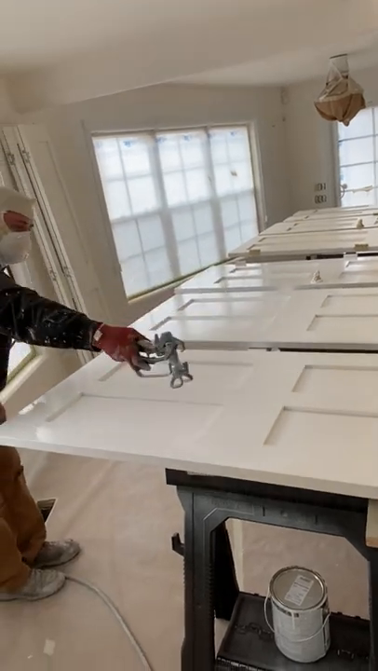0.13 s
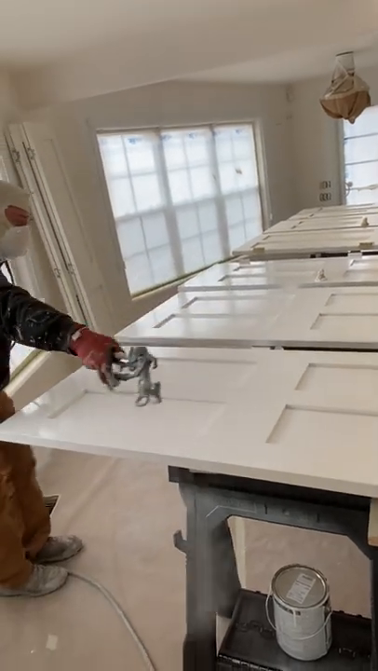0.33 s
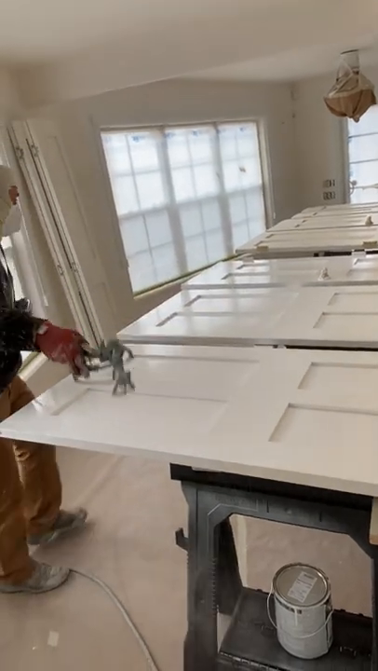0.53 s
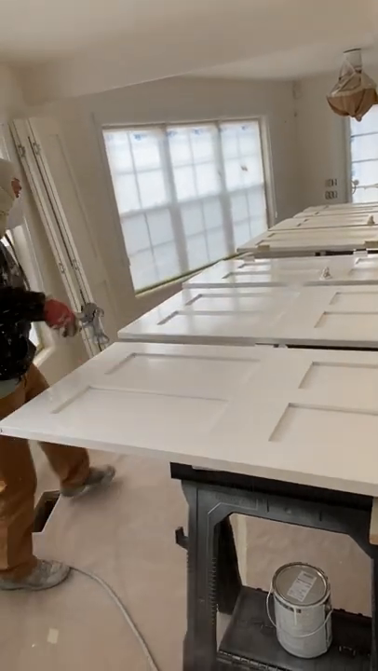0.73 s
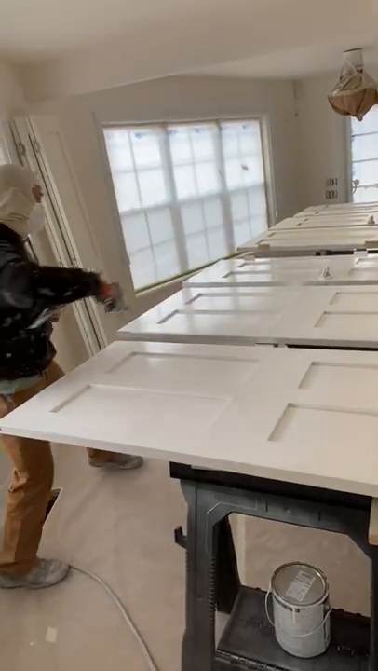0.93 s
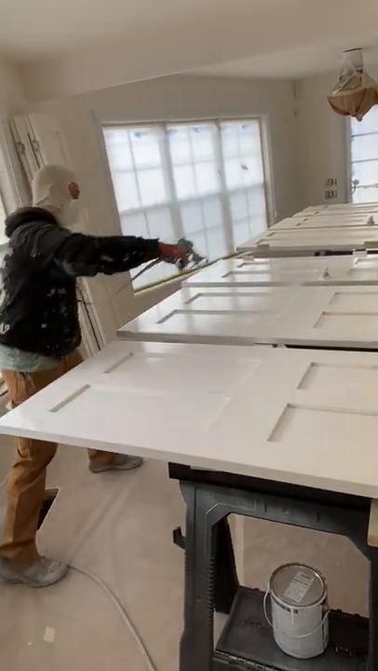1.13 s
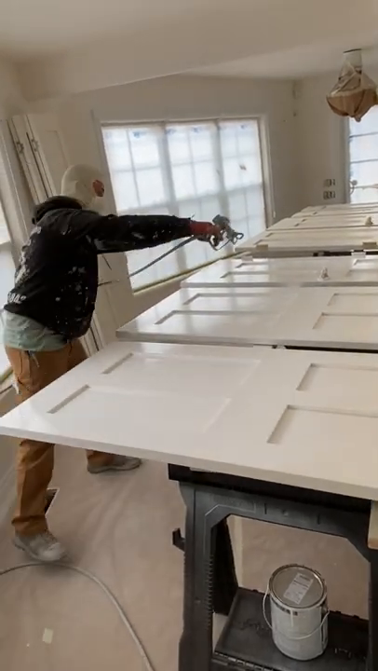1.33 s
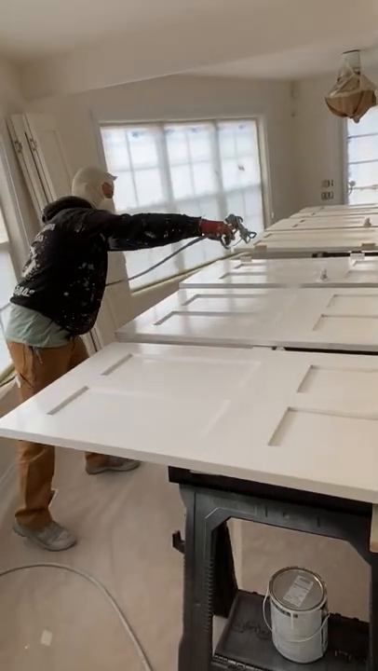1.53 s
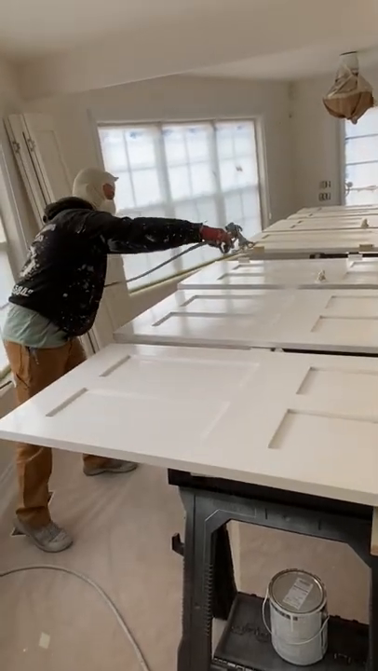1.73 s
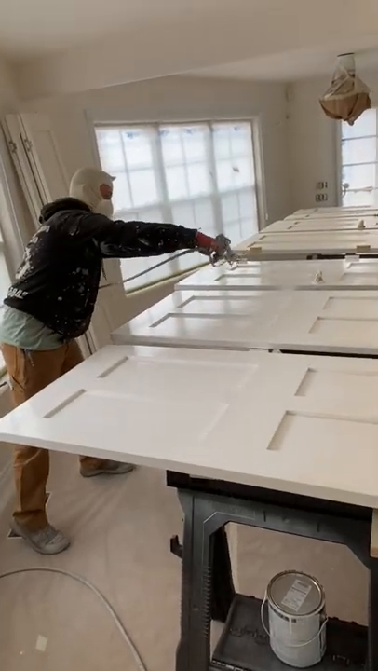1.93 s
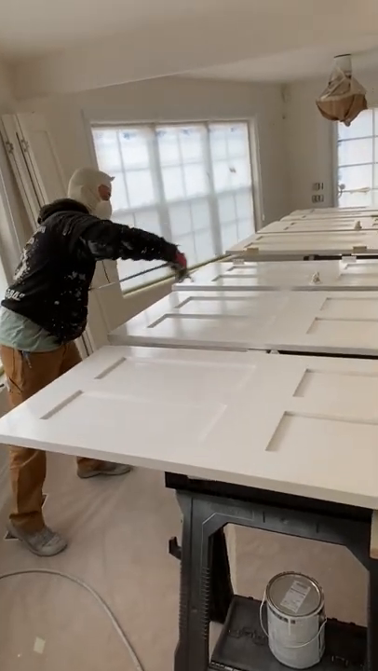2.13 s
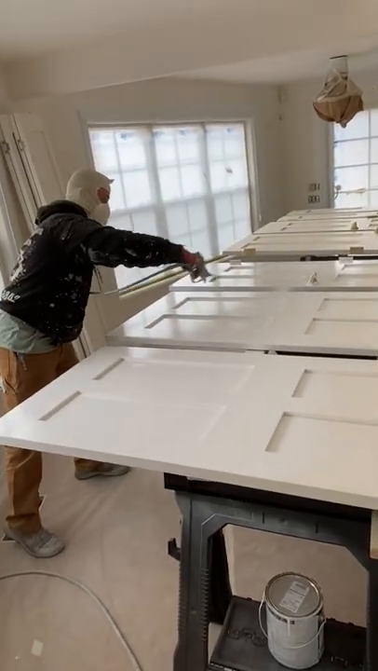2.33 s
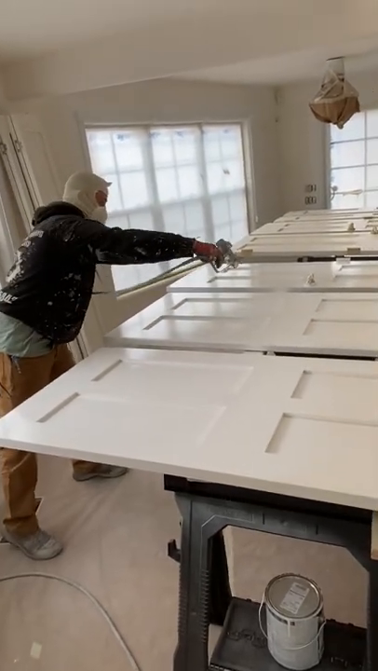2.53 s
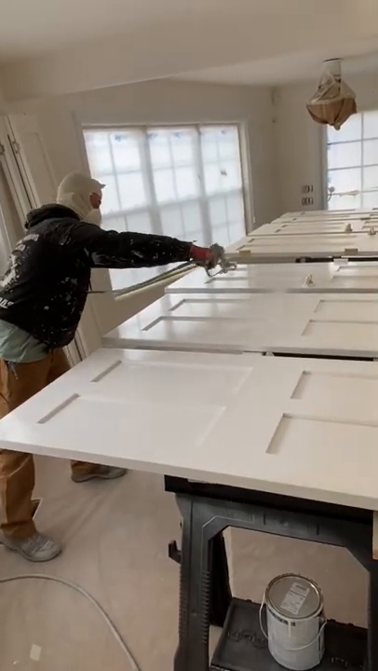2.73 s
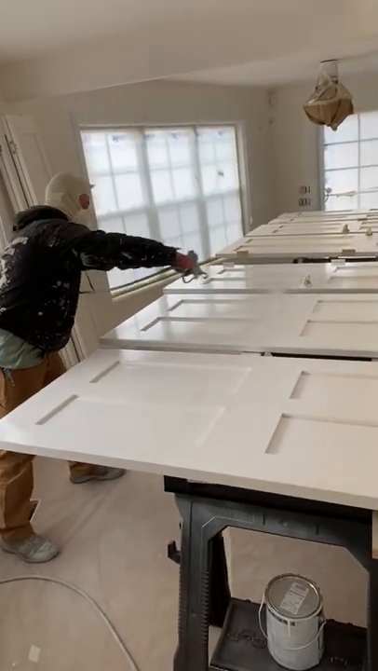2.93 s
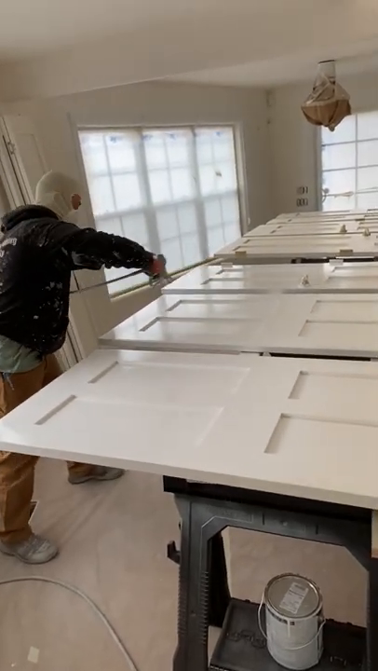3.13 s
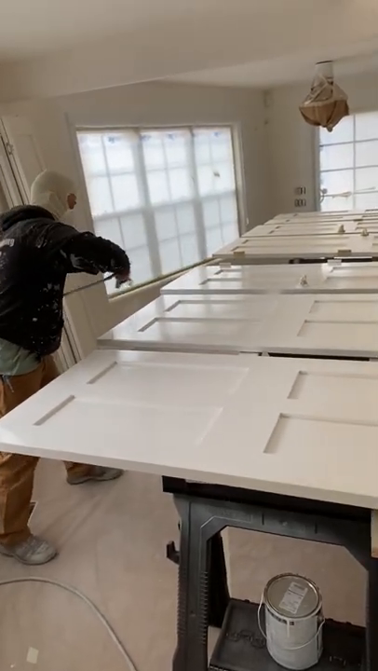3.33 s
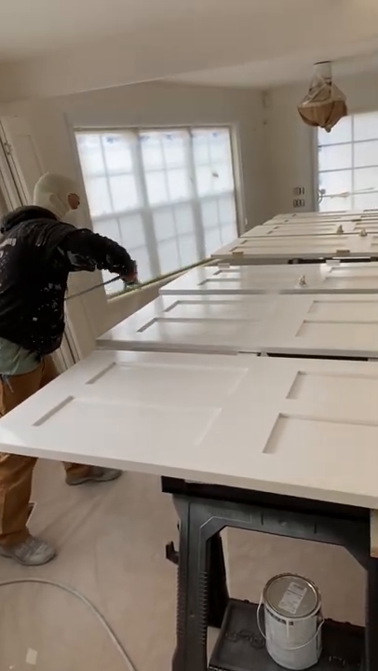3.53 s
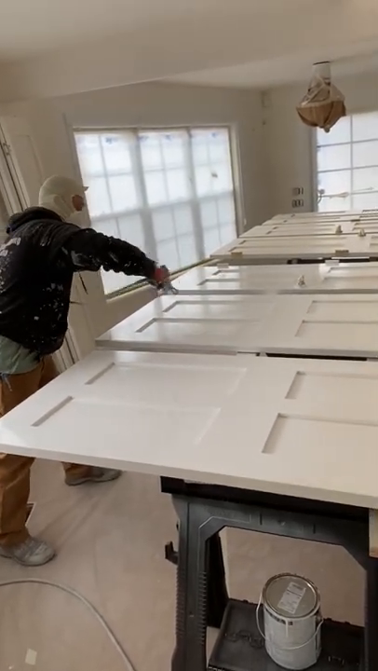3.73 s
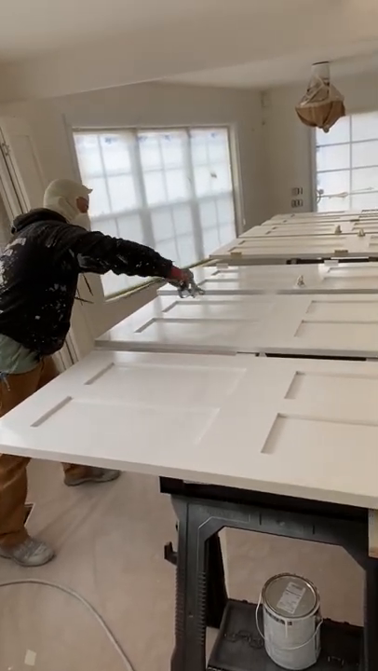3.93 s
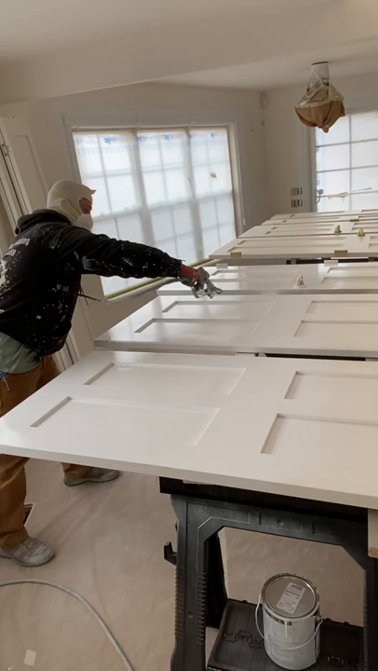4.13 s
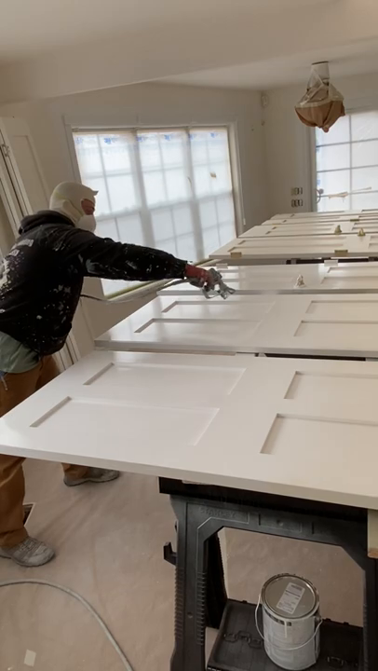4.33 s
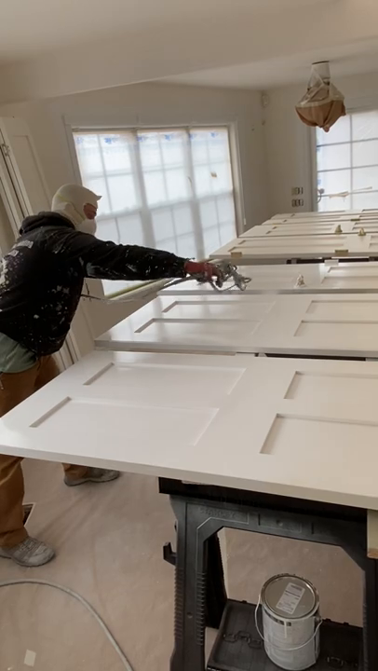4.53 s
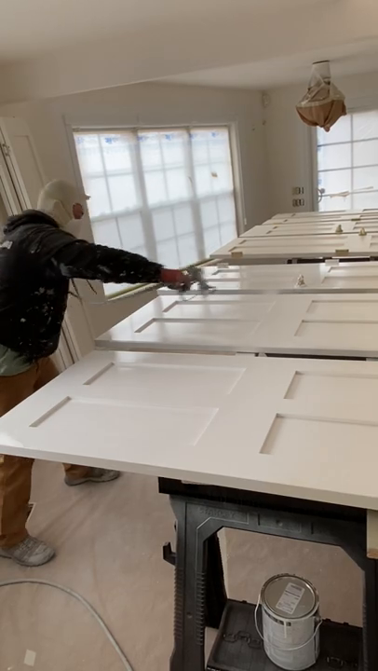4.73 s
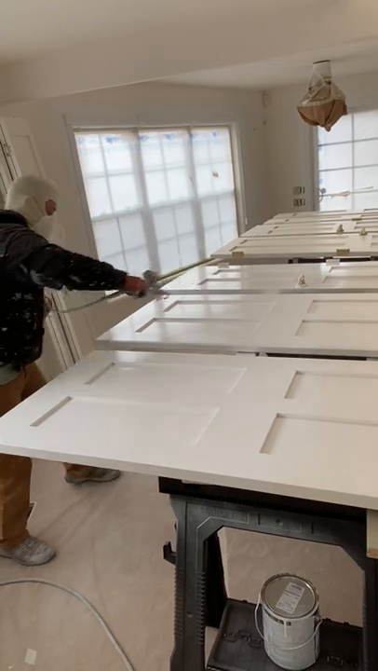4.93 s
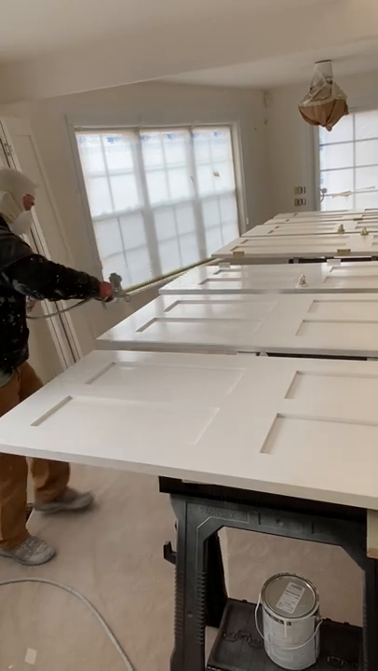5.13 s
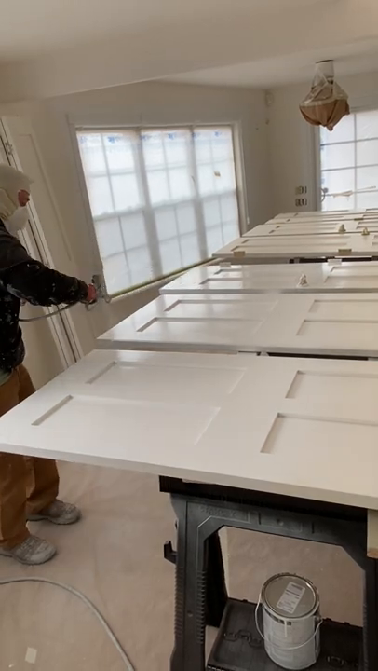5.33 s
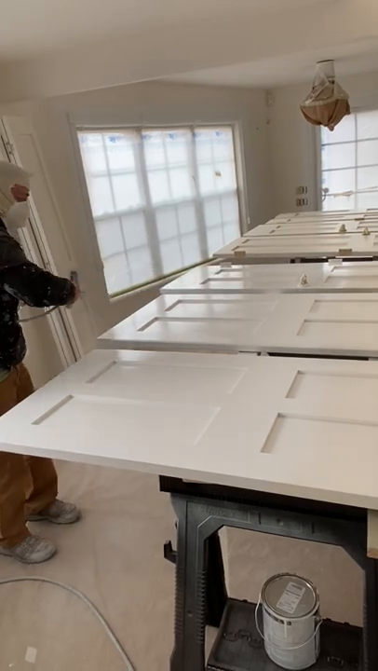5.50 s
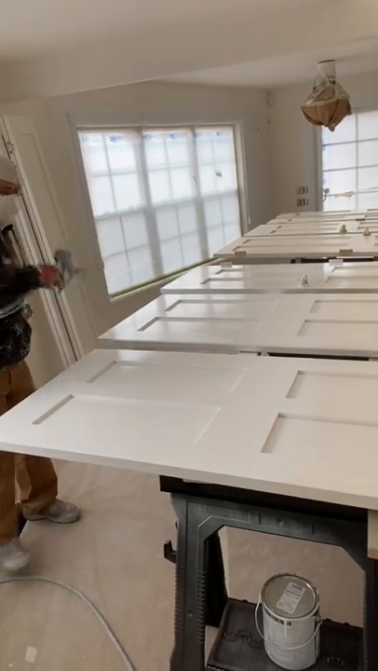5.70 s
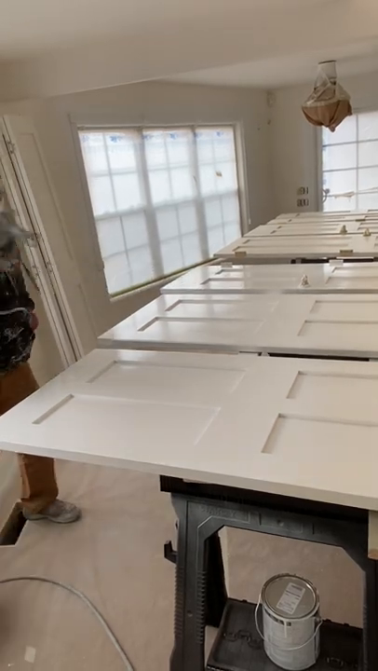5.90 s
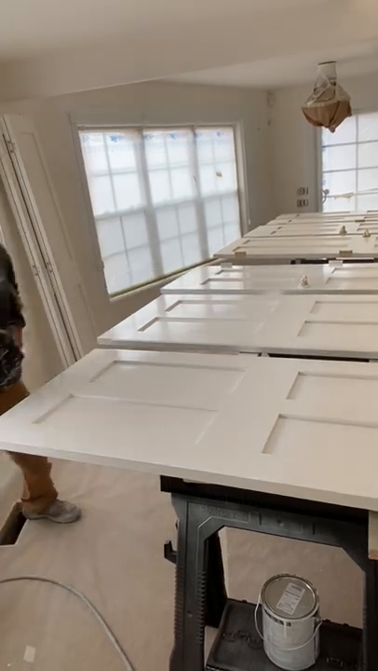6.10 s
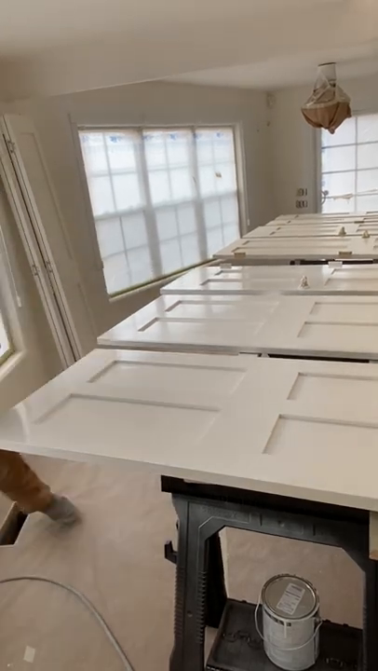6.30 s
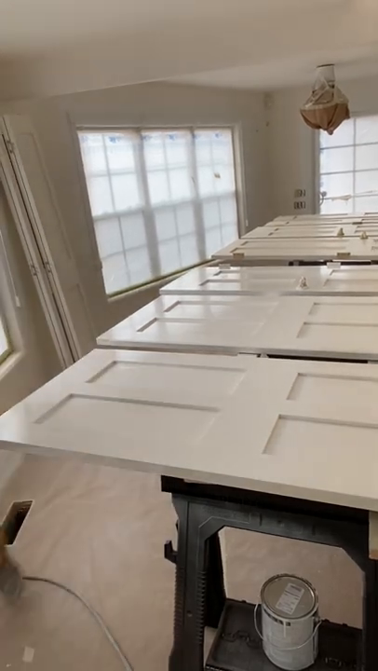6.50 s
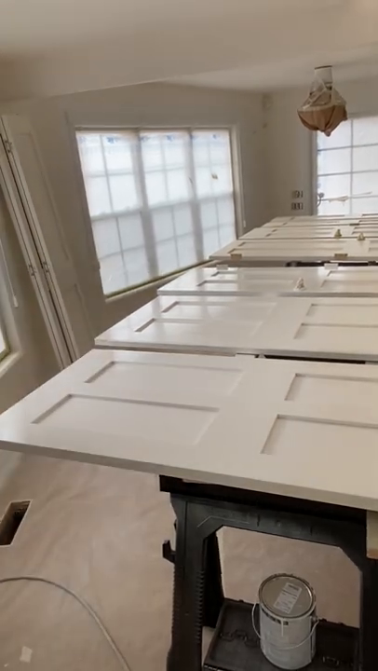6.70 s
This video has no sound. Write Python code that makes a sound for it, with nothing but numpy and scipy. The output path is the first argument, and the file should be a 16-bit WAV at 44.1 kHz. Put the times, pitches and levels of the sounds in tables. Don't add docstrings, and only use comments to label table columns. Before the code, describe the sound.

A paint sprayer hisses in four trigger pulls in a bare, echoing room, with footsteps, paper crackles and small knocks between them.

```python
import sys
import numpy as np
from scipy import signal
from scipy.fft import rfft, irfft, next_fast_len
from scipy.io import wavfile
from scipy.ndimage import uniform_filter1d

SR = 44100
rng = np.random.default_rng(int(sys.argv[2]) if len(sys.argv) > 2 else 0)


def store_wav(level_fs):
    pcm = np.round(np.clip(np.atleast_2d(level_fs), -1, 1) * 32767)
    wavfile.write(sys.argv[1], SR, pcm.T.astype(np.int16))


def gain_from_decibels(decibels):
    exponent = np.asarray(decibels, float) / 20
    return 10 ** exponent


N = 302526
RUN_IN = SR // 2
T = np.arange(-RUN_IN, N) / SR


def on_log(table, hz):
    f, v = np.transpose(table)
    return np.interp(np.log(hz + 1), np.log(f + 1), v)


def unit(x):
    return x / np.sqrt(np.mean(x ** 2))


def bands(x, centres):
    size = next_fast_len(len(x))
    spectrum = rfft(x, size)
    log_hz = np.log(np.fft.rfftfreq(size, 1 / SR) + 1)
    for row in np.eye(len(centres)):
        share = np.interp(log_hz, np.log(centres), row)
        yield irfft(spectrum * share, size)[:len(x)]


def colour(x, table):
    size = next_fast_len(len(x))
    gain = gain_from_decibels(on_log(table, np.fft.rfftfreq(size, 1 / SR)))
    return unit(irfft(rfft(x, size) * gain, size)[:len(x)])


def walk(rate):
    k = int(SR / rate)
    held = np.repeat(rng.standard_normal(len(T) // k + 1), k)
    return 1.65 * uniform_filter1d(uniform_filter1d(held, k), k)[:len(T)]


def grains(rate, spread_db):
    hit = rng.random(len(T)) < rate / SR
    size_db = spread_db * np.minimum(rng.exponential(size=len(T)), 2)
    return hit * rng.standard_normal(len(T)) * gain_from_decibels(size_db)


def swells(s, peak_db, build, linger, still_db):
    t = T[::20, None]
    away = np.maximum((s - t) / build, (t - s) / linger)
    power = gain_from_decibels(2 * peak_db - 40 * away)
    return np.interp(T, t[:, 0], np.sqrt(power.sum(axis=1) + gain_from_decibels(2 * still_db)))


def jet():
    # (needle opens [s], needle shuts [s], hiss at start, middle, end of the arm's sweep [dB])
    pulls = [
        (-.5, 0.369, -24.5, -26.5, -25.5),
        (2.656, 3.425, -25, -27.5, -30.5),
        (3.495, 4.509, -29.5, -27.5, -26.3),
        (4.641, 5.547, -26, -26.3, -28.5),
    ]
    # (frequency [Hz], level per Hz [dB])
    nozzle = [(900, -31), (1600, -26), (2300, -18.5), (3300, -15.5), (4700, -10), (5400, -9.5), (7000, -4),
              (8200, -2.5), (11000, 1), (12500, 0.5), (13600, -9), (15500, -6.5), (16200, -37)]
    build_db, build_s = -4, .05
    aimed_db, roar_base_db = -26, -.9
    roar_steady = .6
    droplets = unit(grains(4000, spread_db=3))
    white = unit(rng.standard_normal(len(T))) + .3 * droplets
    flow, roar_db = np.zeros(len(T)), np.zeros(len(T))
    for opens, shuts, *sweep_db in pulls:
        needle = np.clip((T - opens) / 0.0035, 0, 1) * np.clip((shuts - T) / 0.014, 0, 1)
        since = np.abs(T - opens)
        spurt = 1 + .5 * np.exp(-since / 0.016)
        aim_db = np.interp(T, [opens, (opens + shuts) / 2, shuts], sweep_db)
        aim_db = aim_db + build_db * np.exp(-since / build_s)
        flow += needle * spurt * gain_from_decibels(aim_db)
        roar_db += (needle > 0) * (roar_base_db - roar_steady * (aim_db - aimed_db))
    surge_db = .5 * walk(6.42)
    centres = np.array([1200, 2200, 3400, 5000, 6800, 8800, 11000, 14000])
    spray = np.zeros(len(T))
    for hz, band in zip(centres, bands(colour(white, nozzle), centres)):
        flicker_db = 0.44 * walk(14)
        spray += band * gain_from_decibels(surge_db + flicker_db + roar_db * (hz < 4000))
    return flow * spray


def room_tone():
    # (frequency [Hz], level per Hz [dB])
    hush = [(18, -20), (30, -1), (66, 2), (187, -9), (353, -4.5), (620, -13.5), (720, -24), (1500, -22),
            (2760, -26), (5600, -24.5), (6800, -36), (7600, -50.5), (13000, -65.5)]
    fields = np.array([colour(rng.standard_normal(len(T)), hush)[:N] for _ in range(2)])
    return fields * gain_from_decibels(-62.5 + 1.6 * walk(3.0)[:N])


def shoes():
    # (peak [s], rumble [dB], build [s], linger [s])
    loads = [(.25, -44, 0.49, .3), (.36, -44, 0.16, 0.23), (.59, -31.5, 0.03, .2), (1.02, -44.5, .02, 0.33),
             (1.14, -37, 0.18, 0.37), (1.49, -47, .15, 0.068), (1.64, -42.5, .09, 0.052),
             (1.75, -39, 0.042, .14), (2.69, -57.5, 0.19, .4), (3.3, -59, 1.9, .1), (3.42, -50, .07, .1),
             (3.57, -47.5, 0.39, 0.17), (3.93, -55.5, .2, .5), (4.2, -47.5, 0.055, .3),
             (4.3, -47, 0.24, .26), (4.51, -50.5, .2, 0.52), (4.99, -48.5, 0.32, 1.2),
             (5.41, -42.5, 0.56, .4), (5.66, -33.5, 0.039, .1), (5.72, -45.5, .1, 0.45),
             (6.21, -31, 0.08, .16), (6.32, -45.5, .1, 0.35), (6.78, -50, 1.3, .15)]
    # (peak [s], drag [dB], grit over drag [dB], build [s], linger [s])
    scuffs = [(.36, -50, .5, .35, 0.3), (.59, -48.5, -8.5, 0.11, 0.27), (.75, -57.5, -2, 0.33, .7),
              (1.025, -42, -1, .025, .22), (1.16, -43, -4.5, 0.1, 0.38), (1.49, -64, -7.5, 0.25, 0.11),
              (1.64, -60.5, -1, 0.2, 0.42), (1.79, -63.5, -1.5, 0.066, .3), (1.99, -67, 6, .006, .06),
              (2.29, -68, 5, .04, .3), (2.69, -63, 8.5, .1, 0.23), (3.1, -71.5, 6.5, 2.2, 1.6),
              (3.36, -53.5, 7.5, .03, 0.18), (3.6, -65, 4.5, 0.64, 1.5), (4.21, -52, -10, .05, .7),
              (4.48, -57.5, -3, .6, 0.26), (4.68, -61, -2, .3, .2), (4.99, -44, 3.5, 0.14, 0.19),
              (5.33, -50.5, 6, 0.49, .7), (5.6, -49.5, 17.5, 0.08, 0.14), (5.665, -38, -2.5, .05, .18),
              (5.95, -58, 5, 0.54, 1.1), (6.199, -42.5, -3, .2, .4), (6.75, -57.5, 4, 1.5, .8)]
    # (peak [s], crackle [dB], build [s], linger [s])
    paper = [(.46, -49, .08, 0.1), (.619, -44, .004, 0.062), (.7, -59.5, .1, 0.34), (.92, -56, .7, .3),
             (1.016, -52, .012, .7), (1.143, -38.5, .004, .05), (1.17, -52, .03, .22),
             (1.456, -62, .02, .1), (1.594, -49, .004, .14), (1.67, -61, 0.092, .06),
             (1.768, -47, .006, 0.047), (1.79, -61, .02, .16), (1.988, -63, .004, .06),
             (2.321, -74, .1, .03), (2.591, -56.5, .005, .065), (4.986, -39.5, 0.17, 0.2),
             (5.284, -44.5, .6, 0.48), (5.561, -25.5, .005, 0.089), (5.64, -46, .02, 0.16),
             (5.88, -63, 0.48, .25), (6.085, -45, .003, .4), (6.186, -38.5, 0.045, .1),
             (6.318, -42, 0.11, 0.079), (6.6, -65, 1.1, 1.9), (6.834, -54, .02, .03)]
    # (frequency [Hz],
    # level per Hz [dB])
    board_tone = [(25, -18.5), (45, 0.5), (75, 6.5), (130, -4.5), (220, -6.5), (400, -40)]
    drag_tone = [(130, -19), (290, -2.5), (420, -2), (620, -2.5), (800, -6), (2000, -35.5)]
    scrape_tone = [(400, -30.5), (800, 3), (1300, 0.5), (2000, -1), (3000, -27)]
    crackle_tone = [(900, -11.5), (1800, -8.5), (2700, -0.5), (3500, -4.5), (5000, -8), (8000, -12.5),
                    (11000, -18), (13000, -33), (16200, -50)]
    # (rumble [dB], drag [dB], scrape [dB])
    still_db = (-68.5, -83, -90)
    s, drag_db, grit_db, build, linger = np.transpose(scuffs)

    rumble = colour(rng.standard_normal(len(T)), board_tone) * gain_from_decibels(-4.0)
    rumble *= swells(*np.transpose(loads), still_db[0])

    drag = colour(grains(1500, spread_db=3.5), drag_tone) * gain_from_decibels(2.14 * walk(25.087))
    drag *= swells(s, drag_db, build, linger, still_db[1])

    scrape = colour(grains(2500, spread_db=3.5), scrape_tone) * gain_from_decibels(-3 + 1.7 * walk(25))
    scrape *= swells(s, drag_db + grit_db, build, linger, still_db[2])

    crackle = colour(grains(3000, spread_db=-1.5), crackle_tone) * gain_from_decibels(2.9 * walk(30))
    crackle *= swells(*np.transpose(paper), still_db=-95.5)
    return rumble + drag + scrape + crackle


def thuds():
    # (time [s], peak [dB], board pitch [Hz], ring to -60
    # dB [s])
    footfalls = [(0.574, -27.5, 144.8, 0.23), (1.109, -36, 70.2, 0.16), (1.612, -39, 103, 0.27),
                 (1.733, -33.5, 116.3, 0.23), (2.664, -40.5, 200, 0.078), (3.388, -41, 84, 0.25),
                 (3.549, -51, 79.5, 0.18), (3.919, -47, 111, 0.29), (4.269, -38.5, 132.7, 0.34),
                 (4.509, -49, 69, 0.24), (5.644, -34.5, 106.3, 0.26), (6.196, -20, 87.5, 0.16),
                 (0.627, -33.5, 55.7, 0.59),
        (1.023, -25, 74.7, 0.31),
        (5.38, -39, 62.7, 0.36),
        (6.263, -33, 71.6, .48),
    ]
    out, t = np.zeros(len(T) + SR), np.arange(SR // 2) / SR
    for s, peak_db, hz, ring in footfalls:
        turns = hz * (t + .3 * .03 * (1 - np.exp(-t / 0.022)))
        overtone = 0.24 * np.sin(2 * np.pi * 1.9 * turns) * np.exp(-t / 0.038)
        body = np.sin(2 * np.pi * turns) + overtone
        soft_push = 1 - np.exp(-t / 0.0073)
        at = int(s * SR) + RUN_IN
        out[at:at + len(t)] += gain_from_decibels(peak_db) * body * soft_push * np.exp(-np.log(1000) * t / ring)
    return out[:len(T)]


def ticks(table, crack_db, sharp):
    out, t = np.zeros(len(T) + SR), np.arange(SR // 5) / SR
    chance = rng.standard_normal((len(table), len(t)))
    for (s, peak_db, hz, ring), noise in zip(table, chance):
        crack = np.diff(noise, prepend=0) * np.exp(-t / 0.00087)
        rough = unit(signal.lfilter(*signal.iirpeak(hz, sharp, SR), noise))
        tone = np.sin(2 * np.pi * hz * t)
        body = (tone + 1.01 * rough) * np.exp(-np.log(1000) * t / ring)
        at = int(s * SR) + RUN_IN
        out[at:at + len(t)] += gain_from_decibels(peak_db - 6.5) * (gain_from_decibels(crack_db) * crack + body)
    return out[:len(T)]


def contacts():
    # (time [s], peak [dB], pitch [Hz], ring to -60 dB [s])
    hard = [(0.618, -27.5, 4000, 0.012), (1.1408, -20.5, 2660, 0.017), (1.1554, -26.5, 5420, 0.02),
            (1.4551, -41.5, 3900, 0.02), (1.5928, -40, 4120, 0.042), (1.7664, -29.5, 3960, 0.022),
            (1.9869, -53.5, 3570, 0.027), (2.2368, -60, 5530, 0.022), (2.5915, -38, 5330, 0.016),
            (5.5568, -18.5, 3850, 0.1), (6.0836, -39, 4300, 0.025), (6.121, -30, 4540, 0.032),
            (6.1614, -34.5, 3020, 0.029), (6.1784, -20, 3620, 0.017), (6.8334, -44.5, 2820, 0.02)]
    # (time [s], peak [dB], pitch [Hz], ring to -60 dB [s])
    dull = [
        (1.013, -33, 402, 0.053),
        (1.619, -46, 1135, 0.12),
        (2.108, -54, 524, 0.083),
        (2.41, -51, 500, 0.086),
        (3.359, -41, 387, 0.07),
        (4.161, -43, 533, 0.11),
        (5.019, -33.5, 440, 0.097),
        (5.648, -22.5, 441, 0.042),
        (5.696, -24, 413, 0.2),
        (6.106, -32, 1010, 0.093),
    ]
    return ticks(hard, crack_db=-2.5, sharp=0.96) + ticks(dull, crack_db=-19, sharp=4.4)


def room(dry, to_walls, wet_db, smear, stride):
    # (frequency [Hz], decay to -60 dB [s], level [dB])
    echo = [(59.4, 0.64, -23.5), (250, 0.52, -1.5), (1000, 0.55, -3.5), (3500, 0.58, 1), (6900, 0.45, -2.5),
            (14000, 0.29, -6)]
    t = np.arange(int(.8 * SR)) / SR
    size = next_fast_len(len(T))
    lag = np.pi / 2 + np.r_[0, 0, np.cumsum(2 * np.pi * rng.random(60))]
    lag_hz = np.arange(len(lag)) / smear
    bent = np.exp(-1j * np.interp(np.fft.rfftfreq(size, 1 / SR), lag_hz, lag))
    out = np.array([dry, irfft(rfft(dry, size) * bent, size)[:len(T)]])
    onset = np.clip(t / 0.0093, 0, 1)
    for place in range(3):
        tails = np.zeros((2, len(t)))
        for tail in tails:
            parts = bands(rng.standard_normal(len(t)), np.array(echo)[:, 0])
            for band, (_, t60, band_db) in zip(parts, echo):
                decay = np.exp(-np.log(1000) * t / t60) / np.sqrt(t60 * SR / np.log(1e6))
                tail += band * gain_from_decibels(band_db) * decay
        here = np.sqrt(2 / 3) * np.cos(np.pi * (T / stride - place / 3))
        wet = signal.fftconvolve((here * to_walls)[None], tails * onset, axes=1)
        out += gain_from_decibels(wet_db) * wet[:, :len(T)]
    return out


def scene():
    steady = jet() + shoes() + thuds()
    taps = contacts()
    to_walls = steady + gain_from_decibels(-5.5) * taps
    fields = room(steady + taps, to_walls, wet_db=1.0, smear=0.002194, stride=0.8997)
    return fields[:, RUN_IN:] * gain_from_decibels(-0.5) + room_tone()


def roll_off(x):
    return signal.sosfilt(signal.butter(12, 15830, fs=SR, output="sos"), x)


def record(dry):
    # (frequency [Hz], left leads by [rad])
    lead = [(0, 0), (340, -.3), (690, 1.3), (1400, .2), (1750, .25), (2400, 2.5), (3100, 4), (3800, 6.2),
            (4150, 6.7), (5500, 12.9), (7600, 14), (12400, 15.1), (13050, 15.25), (13600, 5 * np.pi)]
    # (frequency [Hz],
    # likeness [0-1])
    likeness = [(60, 0.98), (130, 0.95), (280, 0.98), (600, 0), (1000, 0.4), (1550, 0.89), (2200, 0.6),
                (3100, 0), (4000, 0.15), (5100, 0.3), (5800, 0.62), (7500, 0.86), (13050, 1), (13600, 0.99)]
    # (frequency [Hz], left minus right [dB])
    lean = [(60, -0.5), (200, -4), (480, -4), (1000, 3.5), (2000, -.5), (4000, -1.5), (5150, -3.5),
            (6200, 0), (9500, 0.9), (12500, 0)]
    size = next_fast_len(N + SR // 10)
    hz = np.fft.rfftfreq(size, 1 / SR)
    shared, opposed = rfft(dry, size)
    alike = np.clip(on_log(likeness, hz), 0, 1)
    shared = shared * np.sqrt((1 + alike) / 2)
    opposed = opposed * np.sqrt((1 - alike) / 2)
    turn = np.exp(.5j * np.interp(hz, *np.transpose(lead))) * gain_from_decibels(on_log(lean, hz) / 2)
    left, right = (shared + opposed) * turn, (shared - opposed) / turn
    ports = irfft(np.array([left, right]), size)[:, :N]
    return roll_off(ports)


dry = scene()
out = record(dry)
store_wav(out)
```